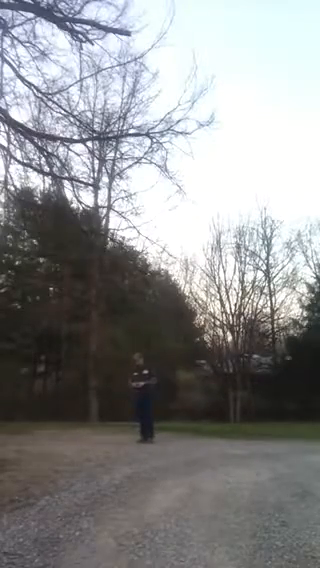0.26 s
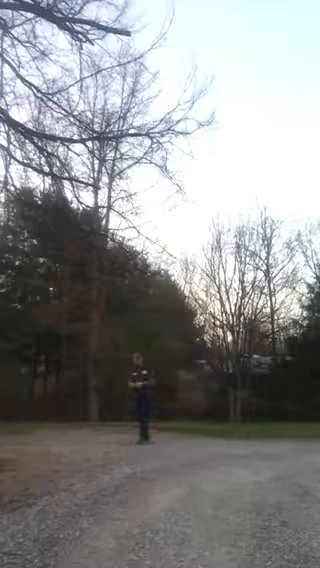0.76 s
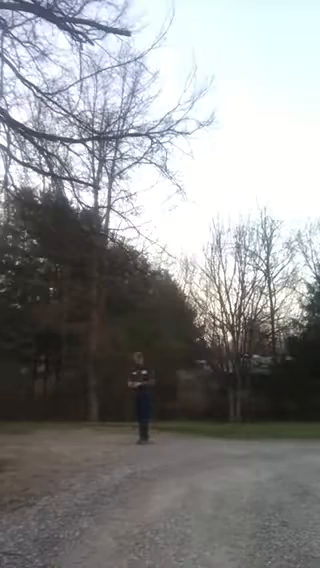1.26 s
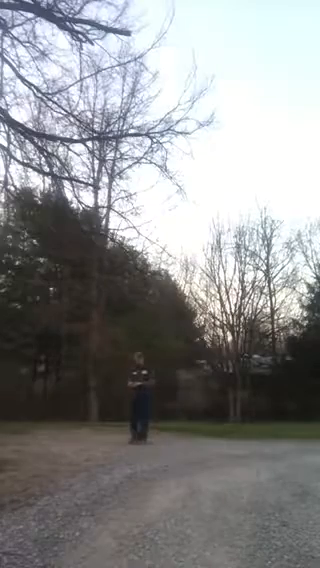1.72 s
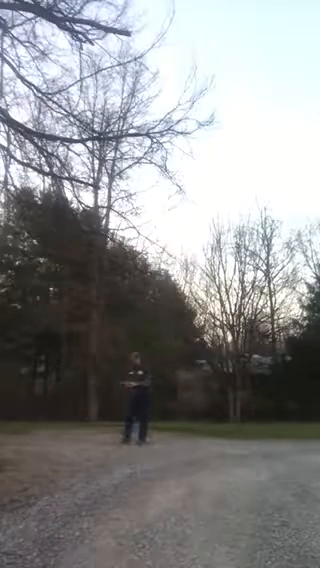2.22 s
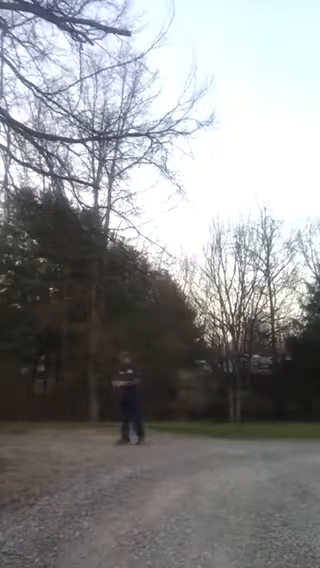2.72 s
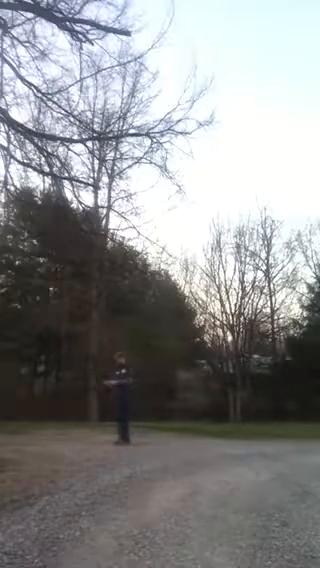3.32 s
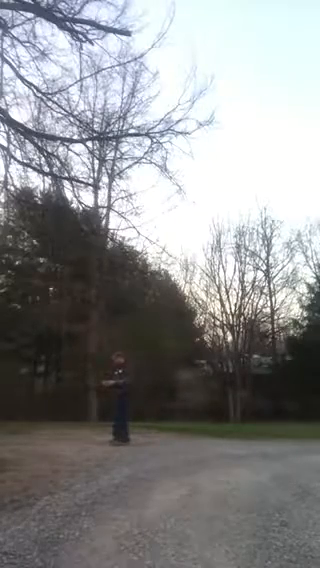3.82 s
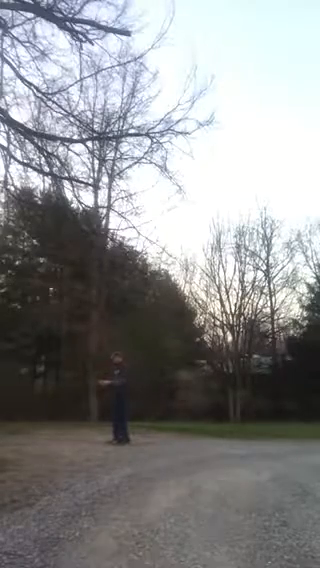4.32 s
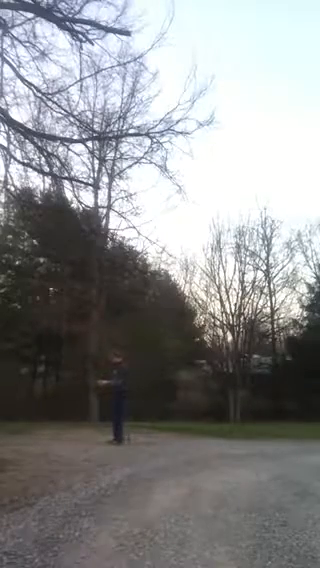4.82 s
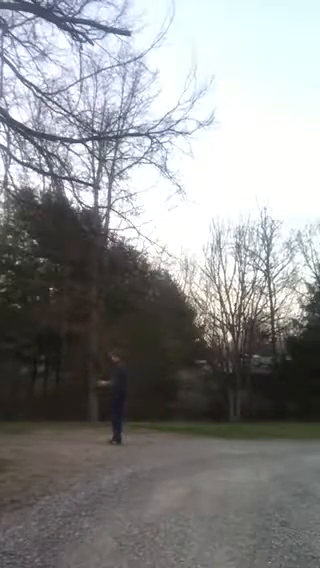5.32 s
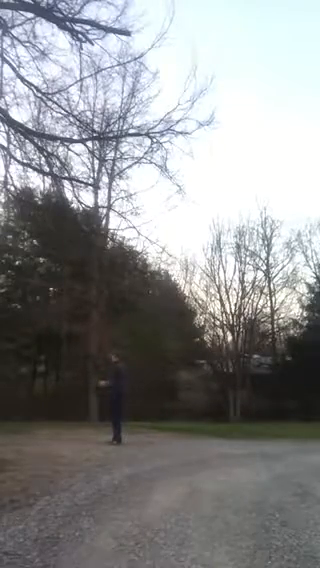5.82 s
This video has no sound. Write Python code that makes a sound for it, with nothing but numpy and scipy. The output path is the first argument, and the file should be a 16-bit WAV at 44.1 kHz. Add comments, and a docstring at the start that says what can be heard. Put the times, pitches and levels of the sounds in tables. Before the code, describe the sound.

Outdoors at a distance, a scraped friction pot call gives fourteen raspy turkey yelps, then five short clucks, over a low engine hum.

```python
"""A friction pot call outdoors, some way off: fourteen turkey yelps, then five short clucks.
A distant engine note swells and fades over a drone, under soft traffic, breeze and hiss that last throughout.
Each yelp opens as a falling whistle of regular slips, then breaks into rough stick-slip that rings the plate.
The player slowly turns aside, shadowing the direct sound, while trees scatter it back.
The clucks, single short hard slips, follow once the player is fully turned."""
import sys
import numpy as np
from scipy import signal
from scipy.fft import rfft, irfft
from scipy.io import wavfile
from scipy.ndimage import uniform_filter1d

SR = 44100
rng = np.random.default_rng(int(sys.argv[2]) if len(sys.argv) > 2 else 0)


def store_pcm(level_fs):
    """Save levels as 16-bit WAV."""
    pcm = np.round(np.clip(level_fs, -1, 1) * 32767).astype(np.int16)
    wavfile.write(sys.argv[1], SR, np.atleast_2d(pcm).T)


N = 267246
TIME_S = np.arange(N) / SR
BINS_HZ = np.maximum(np.arange(4097) * SR / 8192, 1)


def undb(db):
    """Decibels to gain."""
    return 10 ** (np.asarray(db) / 20)


def unit(x):
    """Scale to rms 1."""
    return x / np.sqrt(np.mean(x ** 2) + 1e-20)


def add(out, start_s, x):
    """Mix x into out from a start time."""
    i = max(int(start_s * SR), 0)
    out[i:i + len(x)] += x[:max(N - i, 0)]


def at(points, time_s):
    """Read a (time, value) curve by straight lines."""
    return np.interp(time_s, *np.transpose(points))


def shape_db(points, hz):
    """Read a spectrum on a log-frequency axis."""
    point_hz, db = np.transpose(points)
    return np.interp(np.log(hz), np.log(point_hz), db)


def colour(x, db):
    """Causal minimum-phase filter with the given gain at BINS_HZ, built from its cepstrum."""
    cepstrum = irfft(np.log(undb(db)))
    cepstrum[1:len(db) - 1] *= 2
    cepstrum[len(db):] = 0
    impulse = irfft(np.exp(rfft(cepstrum)))
    return signal.fftconvolve(x, impulse)[:len(x)]


def walk(rate_hz, size=N):
    """Smooth random wander with a spread near 1."""
    hold = max(int(SR / rate_hz), 1)
    steps = np.repeat(rng.standard_normal(size // hold + 1), hold)
    return 1.3 * uniform_filter1d(steps, hold)[:size]


def tone(hz):
    """Sine of a varying frequency."""
    return np.sin(2 * np.pi * np.cumsum(hz) / SR)


def band_noise(size, order, low_hz, high_hz):
    """White noise through a band-pass."""
    band = signal.butter(order, [low_hz, high_hz], "band", fs=SR, output="sos")
    return signal.sosfilt(band, rng.standard_normal(size))


# outdoor background spectrum, relative: freq_hz, density_db_per_hz
AIR = [(20, -26.5), (35, -19.5), (60, -2), (96, -0.5), (136, -3.5), (200, -10.5), (350, -8), (760, -8),
       (930, -8), (1200, -17), (1600, -28.5), (1950, -20.5), (2300, -39), (3100, -43), (9500, -47),
       (15500, -51.5)]
# far traffic against the calm background: time_s, gain_db
TRAFFIC = [(0, 4), (.6, 2), (1.3, 4), (3.2, .5), (5.5, -1.5), (6.0, 2.5)]
# puffs of wind on the microphone: peak_s, rumble_db
GUSTS = [(1.31, -50), (1.6, -49), (2.3, -48.5), (5.87, -43)]
GUST_HALF_S, BREEZE_DB = 0.06, -59  # puff half-length; steady rumble between puffs


def outdoors(air_db=-48.0):
    """Noise: far traffic swells gently, a breeze rumbles low with a few puffs, a thin hiss stays even."""
    air = undb(air_db) * unit(colour(rng.standard_normal(N), shape_db(AIR, BINS_HZ)))
    traffic = signal.sosfilt(signal.butter(1, 2500, fs=SR, output="sos"), air)
    traffic_gain = undb(at(TRAFFIC, TIME_S))
    rumble = unit(band_noise(N, 3, 44, 72))
    puffs = sum(undb(db) * np.exp(-((TIME_S - peak_s) / GUST_HALF_S) ** 2) for peak_s, db in GUSTS)
    return air + (traffic_gain - 1) * traffic + (undb(BREEZE_DB) + puffs) * rumble


# engine partials: multiple of ENGINE_HZ, relative_db
ENGINE_ORDERS = [(1, 0), (2, -18), (2.5, -17.5), (3, -27.5), (3.5, -29.5), (3.84, -18), (4.18, -16)]
# far machinery: pitch_hz, level_db
DRONE = [(80.7, -53), (131.8, -61), (220.7, -67), (349, -68), (586, -66)]
ENGINE_HZ, ENGINE_PEAK_S, ENGINE_PEAK_DB, ENGINE_REST_DB = 109.4, 1, -40, -54.5
ENGINE_RISE_DB_PER_S, ENGINE_FADE_DB_PER_S = 5.5, 8.5


def hum():
    """Engine partials fade to a steady rest over a wavering drone; the lowest note first swells."""
    since_s = TIME_S - ENGINE_PEAK_S
    engine_db = np.maximum(ENGINE_PEAK_DB - ENGINE_FADE_DB_PER_S * np.maximum(since_s, 0), ENGINE_REST_DB)
    swell_db = ENGINE_RISE_DB_PER_S * np.minimum(since_s, 0)
    phase = 2 * np.pi * np.cumsum(ENGINE_HZ * (1 + 0.002 * walk(3))) / SR
    engine = np.zeros(N)
    for i, (multiple, db) in enumerate(ENGINE_ORDERS):
        partial_db = db + (i == 0) * swell_db + .5 * multiple * walk(4)
        engine += undb(partial_db) * np.sin(multiple * phase)
    drone = sum(undb(db + 2 * walk(4)) * tone(hz * (1 + 0.00699 * walk(5))) for hz, db in DRONE)
    return np.sqrt(2) * (undb(engine_db) * engine + drone)


# faint scuffs and ticks: start_s, length_s, level_db (before the band-pass), centre_hz
SCUFFS = [(.82, .06, -46, 2400), (2.507, .004, -44, 3800)]


def scuffs():
    """Soft bursts of band-passed scratchy noise."""
    out = np.zeros(N)
    for start_s, length_s, level_db, centre_hz in SCUFFS:
        n = int(length_s * SR)
        noise = band_noise(n, 2, 0.72 * centre_hz, 1.22 * centre_hz)
        add(out, start_s, undb(level_db) * noise * np.hanning(n))
    return out


# colour of the sound scattered by the trees: freq_hz, gain_db
TREES = [(800, -4), (1350, -7.5), (1650, 4), (2000, 0.5), (2500, -4), (3000, -10.5), (3550, -1.5),
         (4200, -16.5), (5300, -9.5), (9000, -11)]


def trees(near_db=-12.5, near_t60_s=0.11, far_db=-9.5, far_t60_s=0.5, air_hz=4500, build_s=0.0083):
    """One echo pattern: ground and trunks die quickly, the tree line later; treble dies first."""
    t = TIME_S[:SR // 2]
    echo = np.zeros(len(t))
    edges_hz = np.geomspace(700, 14000, num=7)
    for low_hz, high_hz in zip(edges_hz, edges_hz[1:]):
        noise = band_noise(len(t), 3, low_hz, high_hz)
        # the t60s hold at low frequency
        treble_loss = np.hypot(1, low_hz / air_hz)
        for db, t60_s in ((near_db, near_t60_s), (far_db, far_t60_s)):
            decay = undb(-60 * t / t60_s * treble_loss) * np.minimum(t / build_s, 1) ** 2
            echo += undb(db) * noise * decay / np.linalg.norm(decay)
    return colour(echo, shape_db(TREES, BINS_HZ))


def scatter(x, count=7):
    """Crossfades between echo patterns as the player walks about."""
    place = TIME_S / TIME_S[-1] * (count - 1)
    out = np.zeros(N)
    for k in range(count):
        share = np.cos(np.pi / 2 * np.minimum(np.abs(place - k), 1))
        out += signal.oaconvolve(x * share, trees())[:N]
    return out


# how the pot radiates the slips: freq_hz, gain_db
POT = [(500, -33.5), (950, -7.5), (1150, 4.5), (1400, -3), (1800, 6), (2080, -3.5), (2330, -6), (2700, 0.5),
       (3200, -8.5), (4100, -7.5), (4750, -22.5), (5800, -13.5), (6700, -33), (9600, -28.5), (13000, -52)]
# plate resonances standing out of it: freq_hz, width_hz, lift_db
PLATE = [(1930, 170, 3.5), (5224, 450, 19), (8560, 440, 17)]


def pot_db(hz, treble_db):
    """Gain of the pot; a harder grip on the striker lifts the treble."""
    peaks_db = sum(lift_db / (1 + (2 * (hz - f) / width_hz) ** 2) for f, width_hz, lift_db in PLATE)
    return shape_db(POT, hz) + peaks_db + treble_db * np.clip((hz - 2000) / 2500, 0, 1)


# whistle overtones: multiple, relative_db
WHISTLE = [(2, -5.5), (3, -11.5), (4, -17.5), (5, -23), (6, -16.5), (7, -20), (8, -31), (9, -14.5)]


def whistle(lead_s, glide_s, level_db, first_db, treble_db, high_hz=1105, low_hz=985, fall_s=0.0046,
            grip_rise_s=0.0053, release_s=0.0022, slack=0.019, steepen=0.26):
    """Regular slips: a thin tone slides down, gaining overtones as the striker bites, until it breaks."""
    t = np.arange(int((lead_s + 3 * release_s) * SR)) / SR - lead_s  # 0 at the break
    n = len(t)
    hz = low_hz + (high_hz - low_hz) / (1 + np.exp((t + glide_s) / fall_s))
    phase = 2 * np.pi * np.cumsum(hz * (1 + 0.0073 * walk(500, n))) / SR
    grip = slack + (1 - slack) / (1 + np.exp(-(t + 0.96 * glide_s) / grip_rise_s))
    out = undb(first_db + pot_db(hz, 0)) * np.sin(phase)
    for k, partial_db in WHISTLE:
        # the highest overtones need the firmest grip
        bite = grip ** (1 + steepen * max(k - 3, 0) * (1 + (k > 5) * 2))
        gain_db = level_db + partial_db + pot_db(k * hz, treble_db) + 0.41 * k * walk(102, n)
        out = out + bite * undb(gain_db) * np.sin(k * phase)
    fade_in = np.minimum((t + lead_s) / 0.013, 1)
    fade_out = np.exp(-(np.maximum(t, 0) / release_s) ** 2)
    return np.sqrt(2) * out * fade_in * fade_out


def scrape(length_s, low_hz, treble_db, ring_db, rough, bend, turn, fade_db, attack_s, release_s,
           second_db, slope_db_per_oct, count=8):
    """Uneven stick-slip; its rate dips in mid-stroke and rises as the striker lifts."""
    t = np.arange(int((length_s + 3 * release_s) * SR)) / SR
    n, u = len(t), t / length_s
    jitter, flutter_db, grit_share = .06 * rough, 2.8 * rough, .42 * rough
    hz = low_hz * (1 + bend * np.abs(np.minimum(u, 1.4) - turn)) * (1 + jitter * walk(1300, n))
    phase = 2 * np.pi * np.cumsum(hz) / SR
    slips = np.sin(phase)
    for k in range(2, count):
        partial_db = second_db + slope_db_per_oct * np.log2(k / 2)
        slips = slips + undb(partial_db) * np.sin(k * phase + rng.uniform(0, 2 * np.pi))
    # surface grit crackles once in each slip
    grit = grit_share * rng.standard_normal(n) * (1 + np.cos(phase))
    # the main plate mode also multiplies the slips, giving sum and difference tones
    plate = tone(PLATE[0][0] * (1 + .04 * walk(900, n))) * undb(4 * np.tanh(walk(200, n)))
    lift = np.exp(-(np.maximum(t - length_s, 0) / release_s) ** 2)
    force = undb(fade_db * u ** 2) * np.minimum(t / attack_s, 1) * lift
    flutter = undb(flutter_db * np.tanh(walk(450, n)))
    friction = flutter * (slips * (1 + 0.57 * undb(ring_db) * plate) + grit)
    ring = undb(ring_db) * force * plate * np.minimum(t / 0.0089, 1)  # builds up over 8.9 ms
    return np.sqrt(2) * (colour(force * friction, pot_db(BINS_HZ, treble_db)) + ring)


# strokes; levels before the pot gain: break_s (whistle to rasp), glide_s (pitch fall before break),
# whistle_db, rasp_length_s, rasp_db
YELPS = [(0.053, 0.027, -26, 0.042, -35), (.383, 0.022, -26, 0.043, -32), (0.717, .022, -27, 0.04, -33.5),
         (1.058, .023, -25, 0.03, -31), (1.38, .026, -25.5, 0.035, -31.5), (1.709, .036, -27.5, .052, -30),
         (2.033, 0.022, -28.5, .058, -29.5), (2.37, 0.018, -28, .056, -29.5), (2.721, .016, -27, .048, -29),
         (3.074, .029, -23.5, .045, -31), (3.425, .033, -26, 0.046, -31), (3.784, 0.021, -24.5, 0.055, -30),
         (4.156, 0.015, -29, 0.063, -31), (4.519, .019, -33, 0.062, -29)]
# strokes grow raspier through the series: time_s, roughness (0-1)
RASPINESS = [(0, .42), (1.1, .6), (2.0, .88), (4.6, 1)]
# grip on the striker: time_s, treble_lift_db
GRIP = [(0, -1.5), (1.8, 2.5), (2.8, 2.3), (4.2, -4), (4.6, -3)]
# thin tone before the pitch falls: length, level before the pot gain at roughness 0, rise to roughness 1
OPENING_S, OPENING_DB, OPENING_GAIN_DB = .026, -48.5, 7
RASP_HZ, RASP_SAG_HZ_PER_S = 1457, 2400  # the longer the rasp, the lower its pitch
YELP_RING_DB = -2  # plate ring relative to the rasp


def yelps():
    """Each stroke is a whistle that breaks into a rasp."""
    out = np.zeros(N)
    for break_s, glide_s, whistle_db, length_s, rasp_db in YELPS:
        rough, treble_db = at(RASPINESS, break_s), at(GRIP, break_s)
        lead_s = OPENING_S + glide_s
        first_db = OPENING_DB + OPENING_GAIN_DB * rough
        add(out, break_s - lead_s, whistle(lead_s, glide_s, whistle_db, first_db, treble_db))
        low_hz = RASP_HZ - RASP_SAG_HZ_PER_S * length_s
        # a light stroke bends upward sooner
        rasp = scrape(length_s, low_hz, treble_db, YELP_RING_DB, rough, bend=0.1448, turn=0.41 * rough,
                      fade_db=-7, attack_s=0.0019, release_s=0.0071, second_db=-13.5, slope_db_per_oct=-3.6)
        add(out, break_s, undb(rasp_db) * rasp)
    return out


# start_s, length_s, level_db (before the pot gain)
CLUCKS = [(5.101, .024, -29), (5.299, .019, -26.5), (5.494, .017, -25.5), (5.750, 0.0262, -28),
          (6.018, 0.026, -29.5)]
CLUCK_HZ, CLUCK_RING_DB, CLUCK_ROUGH = 1193, -3.5, .8  # lowest pitch; plate ring relative to the slip


def clucks():
    """Each is one short hard slip of the striker."""
    out = np.zeros(N)
    for start_s, length_s, level_db in CLUCKS:
        cluck = scrape(length_s, CLUCK_HZ, -0.69, CLUCK_RING_DB, CLUCK_ROUGH, bend=0.486, turn=.58,
                       fade_db=-3, attack_s=0.0037, release_s=0.0067, second_db=-8.5, slope_db_per_oct=-8.0)
        add(out, start_s, undb(level_db) * cluck)
    return out


# the player turns aside: time_s, share (0-1)
TURN = [(0, 0), (3.4, 0.44), (4.5, .65), (5.1, 1)]
# shadow on the direct path when turned: freq_hz, gain_db
SHADOW = [(1400, 1), (2000, -11.5), (2750, -2), (3500, -8), (5300, -4.5), (8500, -12), (9600, -1),
          (11500, -3)]


def turn_aside(call):
    """Direct path: crossfades from the open call to one shadowed by the player."""
    aside = np.clip(at(TURN, TIME_S), 0, 1)
    return (1 - aside) * call + aside * colour(call, shape_db(SHADOW, BINS_HZ))


def scene():
    """Background, scuffs, then the call with its echoes."""
    call = yelps() + clucks()
    return (outdoors() + hum() + scuffs() + scatter(call) + turn_aside(call))[None]


TOP_HZ = 15700


def record(dry):
    """The recorder cuts the top with a steep low-pass."""
    return signal.sosfilt(signal.ellip(10, .1, 70, TOP_HZ, fs=SR, output="sos"), dry)


dry = scene()
out = record(dry)
store_pcm(out)
```